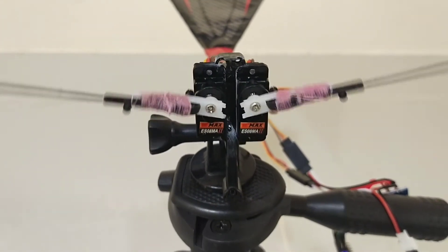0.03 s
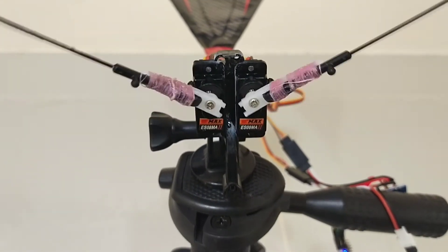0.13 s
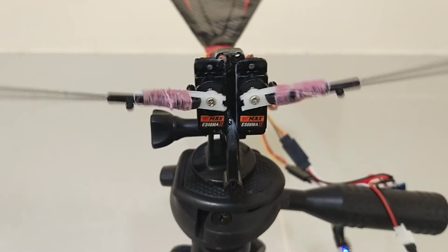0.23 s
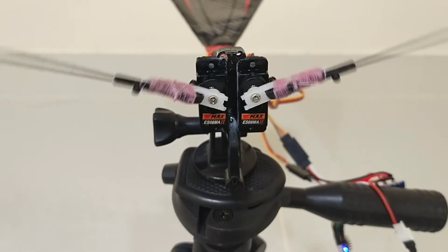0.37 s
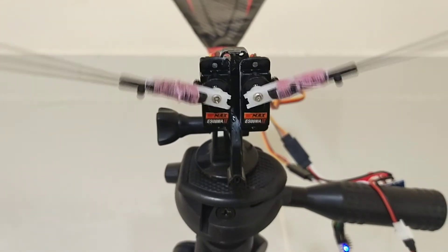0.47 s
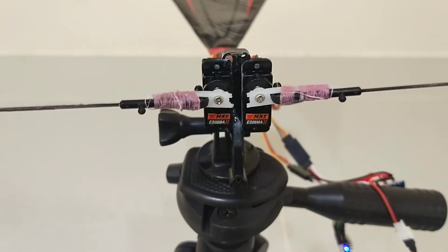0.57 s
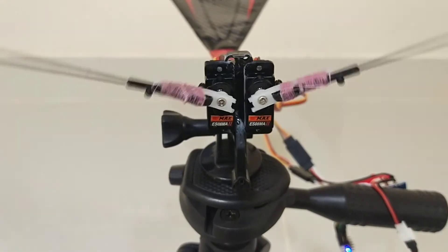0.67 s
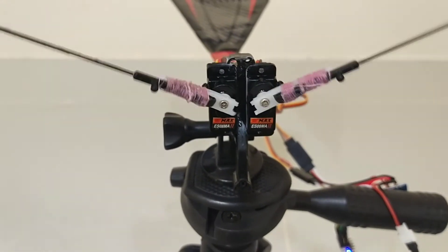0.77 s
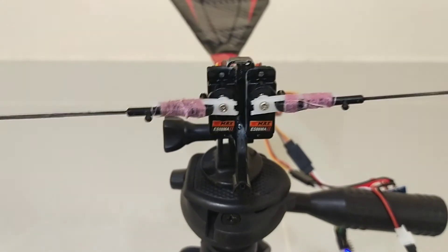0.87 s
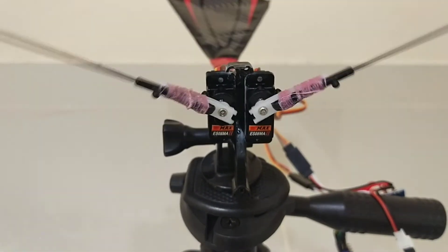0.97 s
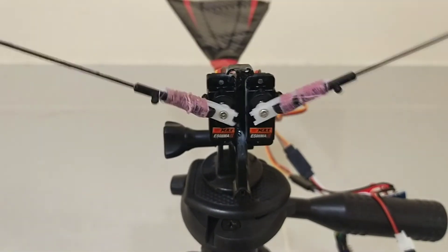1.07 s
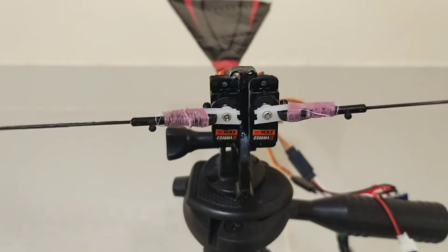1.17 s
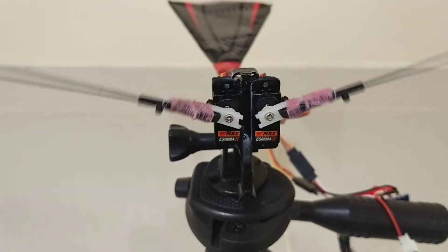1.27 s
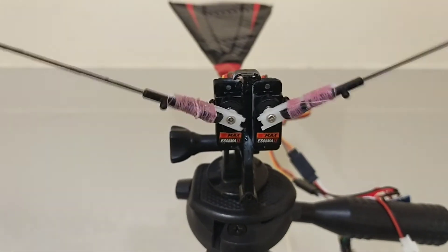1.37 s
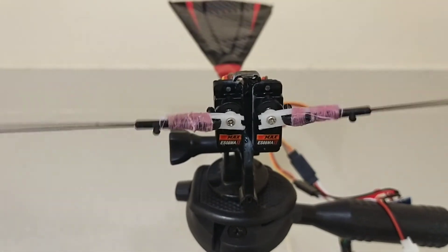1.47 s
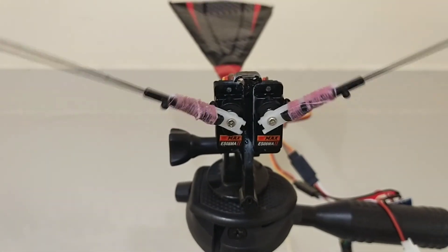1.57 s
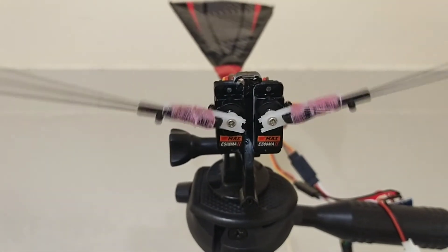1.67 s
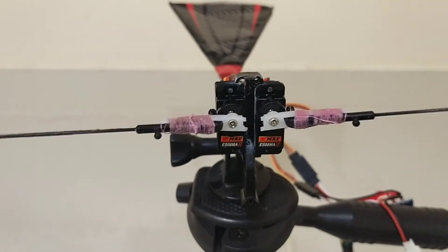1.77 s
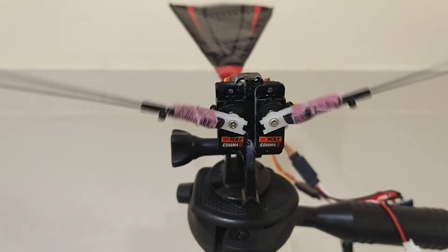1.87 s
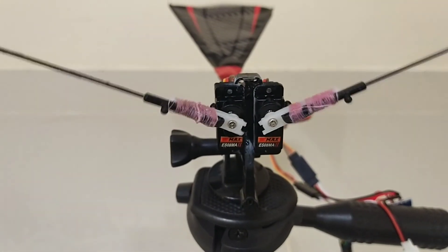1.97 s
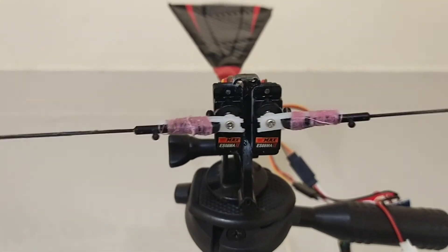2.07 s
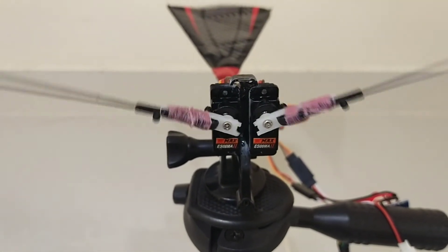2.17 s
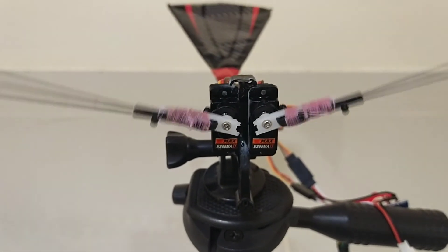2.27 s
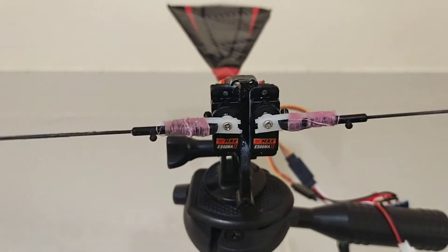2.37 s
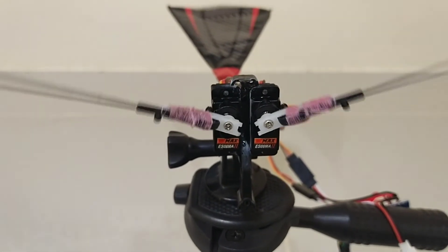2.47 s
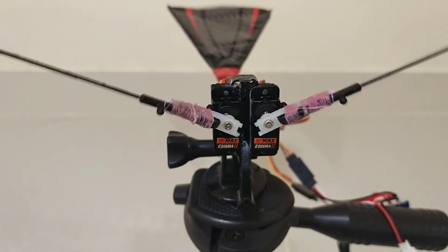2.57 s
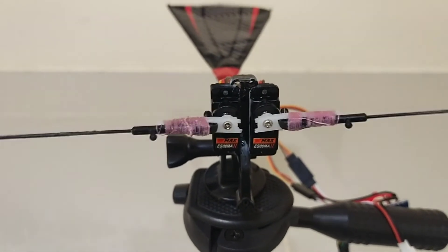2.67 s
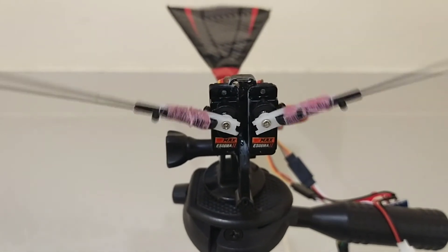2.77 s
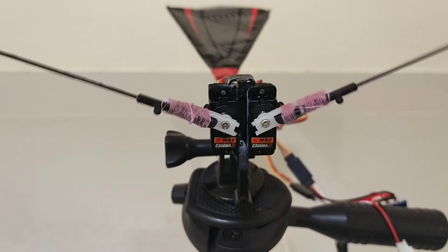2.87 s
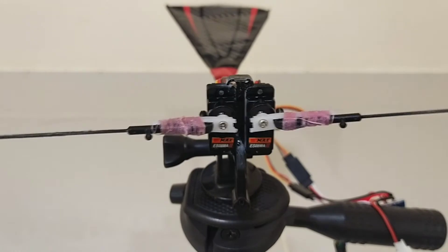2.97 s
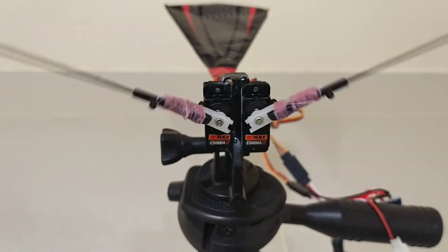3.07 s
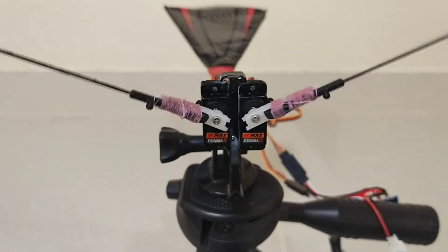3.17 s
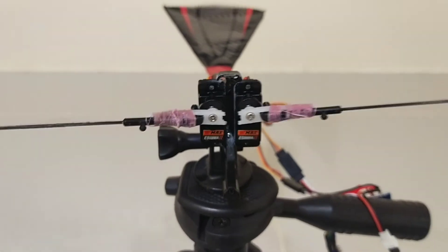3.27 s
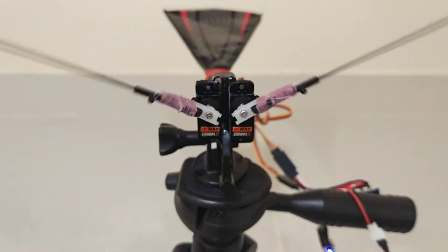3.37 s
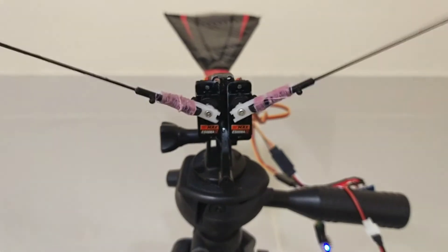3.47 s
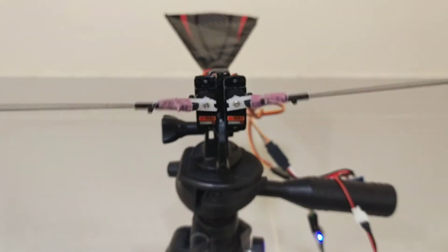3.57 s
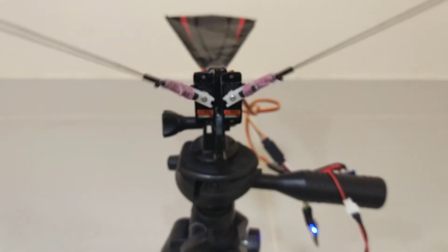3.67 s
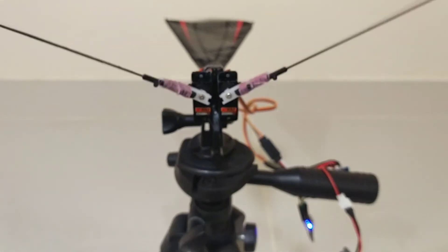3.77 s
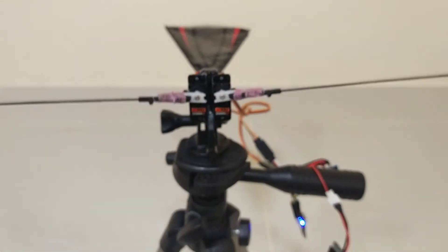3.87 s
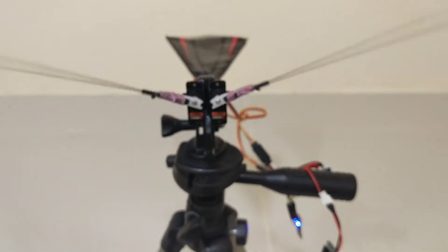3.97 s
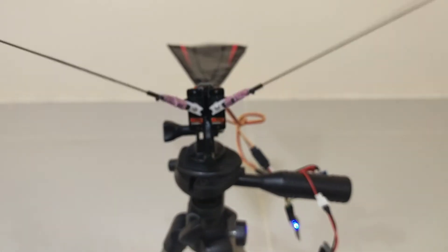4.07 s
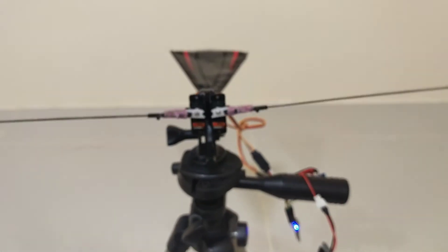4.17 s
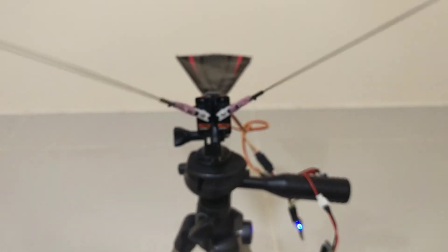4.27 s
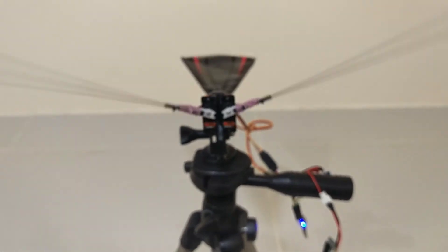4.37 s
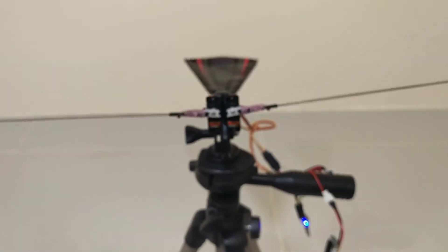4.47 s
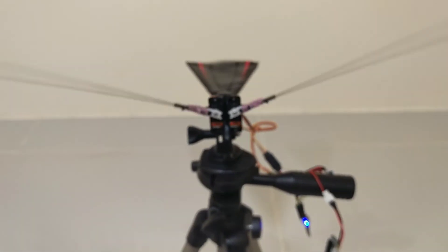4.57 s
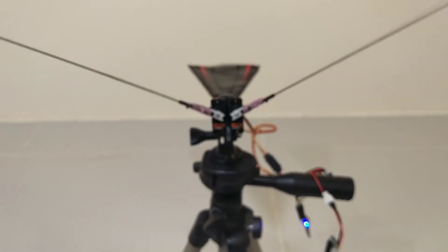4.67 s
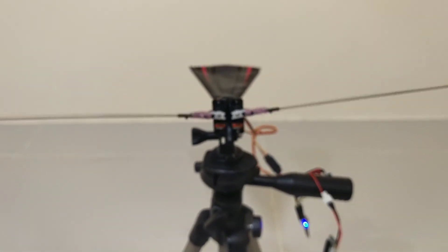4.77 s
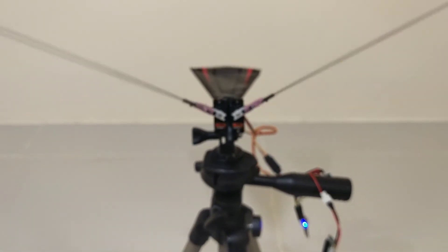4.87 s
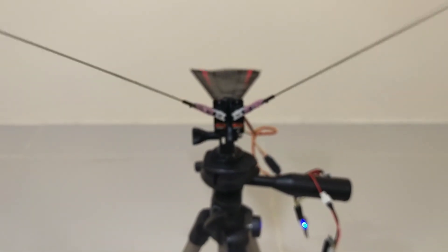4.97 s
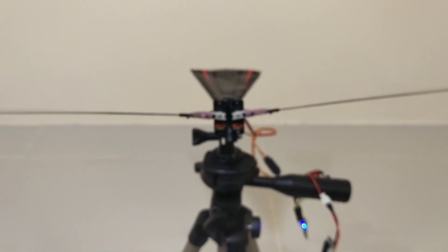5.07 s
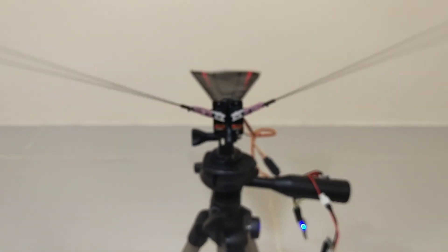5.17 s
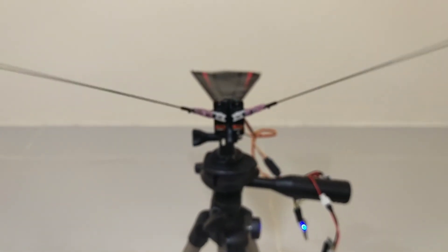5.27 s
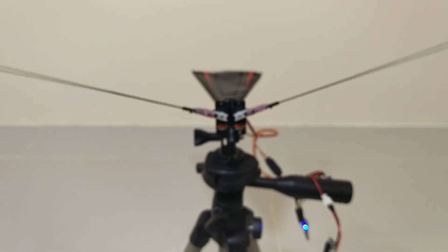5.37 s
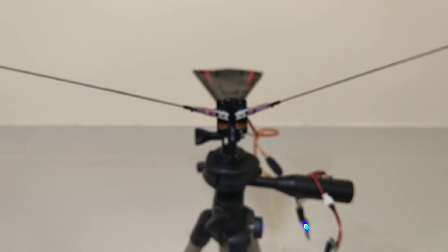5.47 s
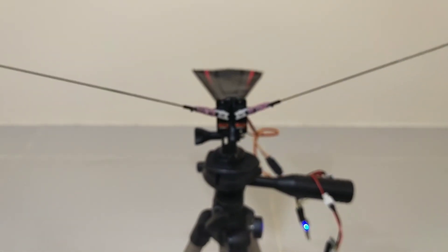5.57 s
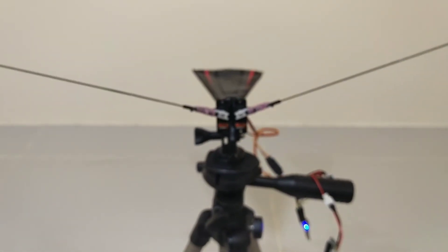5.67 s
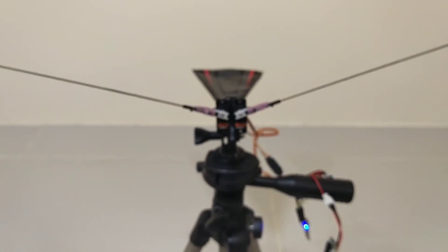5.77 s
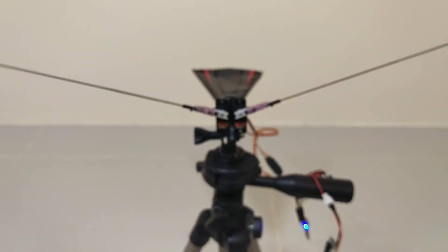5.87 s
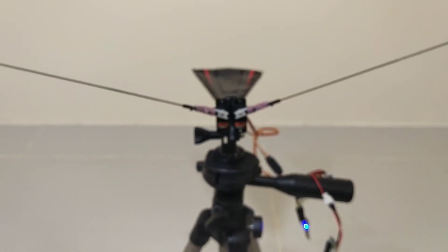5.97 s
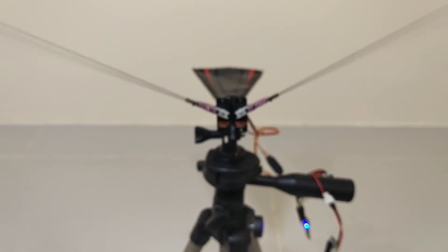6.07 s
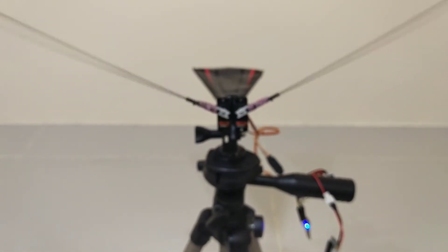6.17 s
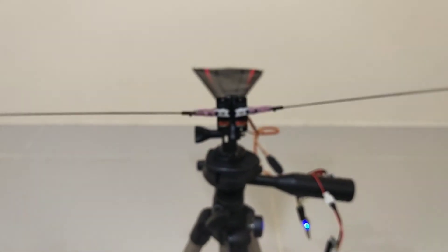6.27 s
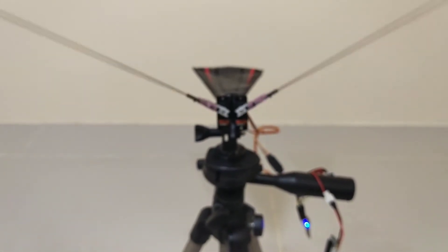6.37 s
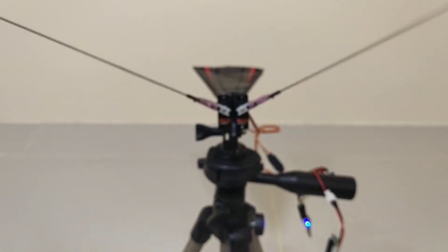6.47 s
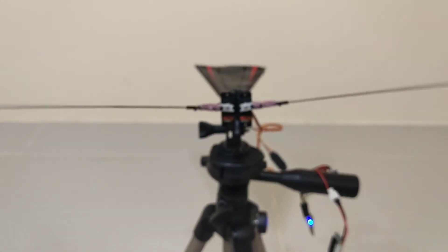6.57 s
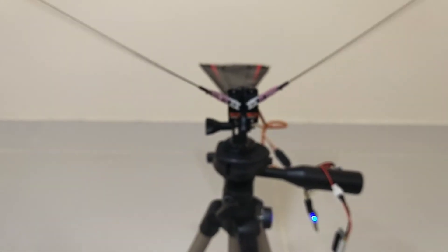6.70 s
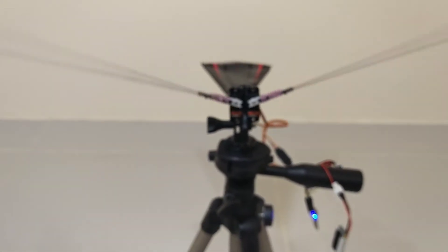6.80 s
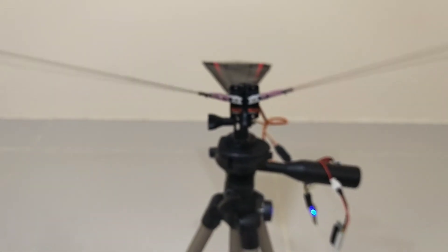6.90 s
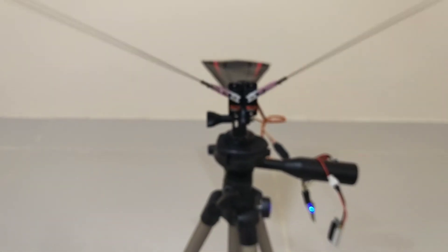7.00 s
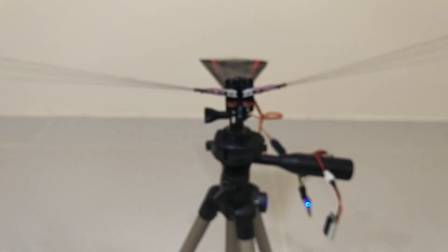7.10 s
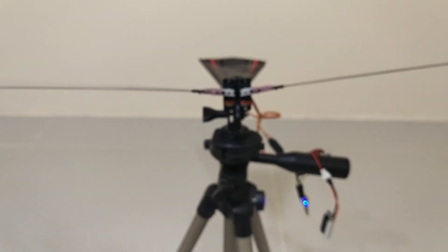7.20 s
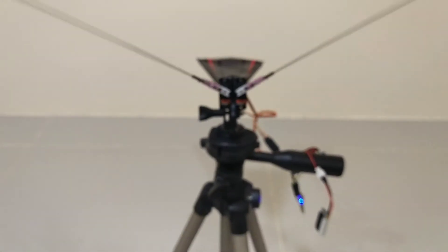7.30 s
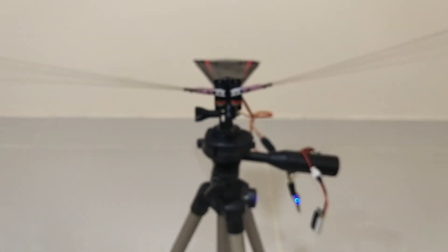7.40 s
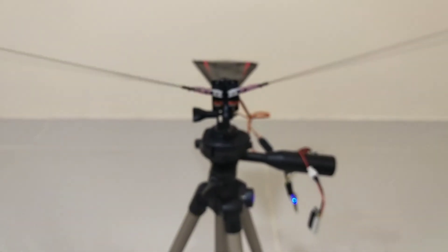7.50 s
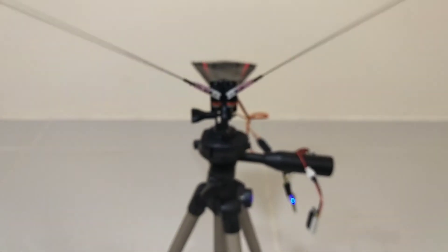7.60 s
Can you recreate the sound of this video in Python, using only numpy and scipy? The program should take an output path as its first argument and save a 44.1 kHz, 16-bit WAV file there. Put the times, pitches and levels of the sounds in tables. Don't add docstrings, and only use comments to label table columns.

```python
import sys
import numpy as np
from scipy import signal
from scipy.fft import rfft, irfft, next_fast_len
from scipy.io import wavfile
from scipy.ndimage import uniform_filter1d, map_coordinates

SR = 44100
rng = np.random.default_rng(int(sys.argv[2]) if len(sys.argv) > 2 else 0)


def generate_wav(signal):
    frames = np.transpose(np.atleast_2d(signal))
    scaled = np.clip(frames, -1, 1) * 32767
    pcm = np.round(scaled).astype(np.int16)
    wavfile.write(sys.argv[1], SR, pcm)


def invert_db(x):
    u = np.asarray(x, float) / 20
    return 10 ** u


N = 336924
T = np.arange(N) / SR


def unit(x):
    return x / np.sqrt(np.mean(x ** 2) + 1e-20)


def along(points, hz, column=1):
    rows = np.transpose(points)
    return np.interp(np.log(hz + 1), np.log(rows[0] + 1), rows[column])


def curves(rows, at=T):
    start, *columns = np.transpose(rows)
    return [np.interp(at, start, column) for column in columns]


def wobble(rate):
    knots = rng.standard_normal(int(N * rate / SR) + 4)
    return map_coordinates(knots, [np.arange(N) * rate / SR])


def filtered(x, response):
    m = next_fast_len(N + 8192)
    return irfft(rfft(x, m) * response(np.fft.rfftfreq(m, 1 / SR)), m)[..., :N]


def below(x, hz, order):
    return filtered(x, lambda f: 1 / (1 + (f / hz) ** order))


def above(x, hz, order=16):
    return filtered(x, lambda f: 1 / (1 + (hz / (f + 1)) ** order))


def pair(alike):
    common, left, right = rng.standard_normal((3, N))
    alike = np.clip(alike, 0, 1)
    return np.sqrt(alike) * common + np.sqrt(1 - alike) * np.array([left, right])


def patches(x, patchy_db, size):
    z = signal.stft(x, nperseg=512)[2]
    field = uniform_filter1d(rng.standard_normal(z.shape[1:]), size=size, axis=0)
    field = uniform_filter1d(field, size=7, axis=1)
    return signal.istft(z * invert_db(patchy_db * unit(field)), nperseg=512)[1][:, :N]


def narrow(hz, width_hz, alike):
    return unit(filtered(pair(alike), lambda f: 1 / (1 + ((f - hz) / width_hz) ** 2)))


def swells(rows, order):
    gain = np.zeros(N)
    for s, db, rise, fall in rows:
        away = np.maximum((s - T) / rise, (T - s) / fall)
        gain += invert_db(np.maximum(db - 20 * away ** order, -200))
    return gain


# (f/Hz, level/dB)
ROOM_AIR = [(30, -32), (60, -11), (130, -0.3), (250, -10.5), (500, -21.5), (1000, -27.5), (1750, -28),
            (2150, -15.5), (2600, -29.5), (3700, -23), (5500, -27.5), (7800, -23), (11000, -25.5),
            (15500, -31)]


def room_air():
    return invert_db(-65) * unit(filtered(pair(alike=.6), lambda f: invert_db(along(ROOM_AIR, f))))


# (t/s, 55 Hz mode level/dB, 86 Hz mode level/dB, time to die 20 dB/s)
FLOOR_THUDS = [(0, -51, -64, .09), (.08, -70, -53, .15), (.42, -47, -61, .15), (1.04, -62, -68, .2),
               (1.51, -71, -69, .4), (2.58, -70, -58, .3), (2.7, -58, -55, .5), (2.92, -61, -59, .35),
               (3.62, -77, -61, .3), (4.23, -80, -59, .13), (4.45, -79, -62, .14), (4.74, -65, -59, .3),
               (5.02, -50, -62, .3), (5.28, -70, -58, .25), (5.57, -73, -60, .9), (6.5, -53, -60, .16),
               (6.98, -69, -60.5, .3), (7.34, -51, -66, .35)]
THUD_RISE_S, STILL_DB = .13, -80


def floor_thuds():
    low_rows = [(s, low_db, THUD_RISE_S, fall) for s, low_db, _, fall in FLOOR_THUDS]
    high_rows = [(s, high_db, THUD_RISE_S, fall) for s, _, high_db, fall in FLOOR_THUDS]
    low = (invert_db(STILL_DB) + swells(low_rows, order=1)) * narrow(55, 5.1, alike=.85)
    high = (invert_db(STILL_DB) + swells(high_rows, order=1)) * narrow(86, 22, alike=.77)
    return invert_db([[1.5], [-1.5]]) * (low + high)


# (t/s, level/dB, time to rise 20 dB/s, time to die 20 dB/s)
HOLDING_HISS = [
    (5.5, -63, .35, .17),
    (5.79, -55.5, .13, .14),
]


def holding_hiss():
    flutter = invert_db([[3], [-3]] + 2.5 * wobble(150))
    return swells(HOLDING_HISS, order=2) * flutter * narrow(7850, 270, alike=.5)


# (t/s, level/dB, time to rise 20 dB/s, time to die 20 dB/s)
PAUSE_HUM = [
    (5.38, -60.5, .07, .26),
]


def pause_hum():
    return swells(PAUSE_HUM, order=1) * narrow(495, 32, alike=.44)


def background():
    return room_air() + floor_thuds() + holding_hiss() + pause_hum()


# (f/Hz, t60/s)
WALL_DECAY = [(300, 1), (3000, 0.48), (8000, 0.34), (15000, 0.1)]


def room(x):
    hz, t, z = signal.stft(rng.standard_normal((2, SR // 2)), SR, nperseg=256)
    fall = invert_db(-60 * t / along(WALL_DECAY, hz)[:, None])
    tail = signal.istft(z * fall, SR, nperseg=256)[1]
    late = np.pad(x, ((0, 0), (300, 0)))
    return signal.fftconvolve(late, tail / np.linalg.norm(tail[0]), axes=1)[:, :N]


FLAP_S, UP_SHARE = .3004, .527
START_S, STOP_S, TWITCH_S, RESTART_S = -.063, 5.133, 5.198, 5.935


def flapping():
    flap = (T - np.where(T < RESTART_S, START_S, RESTART_S)) / FLAP_S % 1
    up = flap < UP_SHARE
    share = np.where(up, flap / UP_SHARE, (flap - UP_SHARE) / (1 - UP_SHARE))
    return share, up.astype(int), (1 - np.abs(2 * share - 1)) * (2 * up - 1)


def drive():
    cut = -900 * np.clip(T - STOP_S, 0, None)
    twitch = 1.9 - 170 * np.abs(T - TWITCH_S)
    again = -1150 * np.clip(RESTART_S + .057 - T, 0, None)
    return np.maximum(np.max([cut, twitch, again], axis=0), -90)


STROKE_TIMING = [
    (.13, .2, 3.2, .2),
    (.2, .12, 3.6, .8),
]
HELD_LOAD_DB = -13


def load(rows, share, up):
    rise, brake, whips, delay = np.array(STROKE_TIMING)[up].T
    start_db, swell_db, end_db, whip_db = np.array(rows)[up].T
    db = start_db * np.clip(1 - share / rise, 0, 1)
    db = db + end_db * np.clip(1 - (1 - share) / brake, 0, 1)
    db = db + swell_db * (share - .6)
    db = db + whip_db * np.cos(2 * np.pi * (whips * share - delay))
    held = (T > STOP_S + .008) & (T < RESTART_S)
    return uniform_filter1d(np.where(held, HELD_LOAD_DB, db), size=200)


MOTOR_SPEED = [(0, 230), (.17, 272), (.42, 300), (.68, 328), (.87, 302), (1, 230)]


def motor_turns(share):
    return np.cumsum(curves(MOTOR_SPEED, share)[0] * (1 + .025 * wobble(50))) / SR


# (beats per turn, level/dB)
COMMUTATOR = [
    (3, -0.36),
    (5, -11),
]


def whine(turns):
    both = np.array([turns + .05 * wobble(90), turns * 1.04 + .1 * wobble(40)])
    tones = 0
    for beats, db in COMMUTATOR:
        unsteady = invert_db(db + 2.4 * np.array([wobble(60), wobble(60)]))
        tones = tones + unsteady * np.sin(2 * np.pi * round(beats) * both)
    return np.array([[.77, .51], [.59, .53]]) @ tones


def teeth(turns, gate_db, rattle_db):
    beat = invert_db(gate_db * np.cos(2 * np.pi * turns) + rattle_db * wobble(900) + .62 * wobble(70))
    return unit(beat * pair(alike=.56))


def arrival(rattle, depth, far):
    n = np.arange(N)
    lag = 2.7 + (.2 - 2.7) * far
    rattle[0] = np.interp(n - np.round(lag), n, rattle[0])
    delayed = n - SR * .0014 * (1 + .05 * wobble(6))
    share_back = np.clip(.55 * (depth - 1.05), 0, 1)
    bounce = np.array([np.interp(delayed, n, side) for side in rattle])
    return (rattle + share_back * bounce) / np.sqrt(1 + share_back ** 2 / 2)


# (f/Hz, level/dB)
LEFT_COLOUR = [(400, -46), (1500, -40), (3500, -27.5), (5000, -18.5), (6200, -7), (7200, -3.5), (8300, -2),
               (9600, -13.5), (10400, -4.5), (11300, -1), (12300, -8), (13500, -7), (14600, -3.5),
               (15600, -18)]
RIGHT_COLOUR = [(400, -49), (1500, -45), (3500, -34.0), (5000, -18.5), (6200, -16), (7400, 5.5),
                (8200, -0.67), (9300, -8), (10300, -8.5), (11300, -40), (12600, -8), (14000, -20),
                (14800, -15), (15600, -34)]
# (f/Hz, left level/dB, right level/dB)
UPSTROKE_COLOUR = [(2500, 1.5, 1.5), (5800, -3, -2.5), (7300, -1.5, -1.5), (8300, -1.5, 4), (10000, .5, .5),
                   (12500, .5, .5), (14200, 1.5, -4)]
# (f/Hz, width/Hz, level over surroundings/dB)
CASE_RINGS = [(2492, 187, 12.5), (2945, 52, 7), (4140, 160, -5.5), (4530, 250, -1.5), (4910, 62, -3),
              (6925, 90, 4.5), (6900, 590, 0.5), (10400, 100, -5.5)]


def cases(rattle, lifting):
    def colour(f):
        rings = sum(db / (1 + ((f - hz) / width * 2) ** 2) for hz, width, db in CASE_RINGS)
        return invert_db(np.array([along(LEFT_COLOUR, f), along(RIGHT_COLOUR, f)]) + rings)

    def turned(f):
        return colour(f) * invert_db([along(UPSTROKE_COLOUR, f, column=1), along(UPSTROKE_COLOUR, f, column=2)])

    up = uniform_filter1d(lifting.astype(float), size=600)
    return unit((1 - up) * filtered(rattle, colour) + up * filtered(rattle, turned))


SIDES = np.array([[.5], [-.5]])


def top_rattle(top, load_db, level_db, angle, depth, lift):
    top_db = -4.3 + 9.5 * angle + (-1.3 + 2.5 * depth) * lift
    pan_db = -4.2 + 2.4 * angle
    beam_db = 1.3 + .22 * (level_db + 20)
    beamed = top + (invert_db(beam_db) - 1) * above(top, 12200)
    return beamed * invert_db(depth * load_db + top_db + SIDES * pan_db)


def gear_growl(growl, load_db, level_db, depth, far, late_db):
    drone_db = 1.1 - 3.5 * far + late_db
    ring_db = -7.5 - 1.5 * (level_db + 20) + 4 * far
    drone = below(growl, 1750, order=12)
    head = filtered(growl, lambda f: 1 / (1 + ((f - 2020) / 65) ** 2))
    growl = growl + (invert_db(drone_db) - 1) * drone + invert_db(ring_db) * head
    held = (T > STOP_S + .02) & (T < RESTART_S)
    return growl * invert_db(.45 * depth * load_db - 3.5 + 5.5 * far - 9 * held)


# (t/s, level/dB, angle off axis [0-1], shading by the moving arms [ratio], left over right/dB)
PHONE_PLACE = [(0, -9.5, -.1, 1.2, 4), (.5, -11.5, .15, 1.2, 4.2), (1.1, -12.6, .45, 1.15, 5.3),
               (2.25, -12.2, .55, 1.3, 5.5), (2.45, -16, .72, 1.35, 4), (2.75, -18.5, .8, 1.6, 3.5),
               (3.3, -20, .8, 1.8, 1.5), (3.65, -25.5, 1.1, 1.95, 2.5), (3.95, -29, 1.1, 1.95, 6),
               (4.4, -28.7, .95, 1.85, 7.5), (4.83, -25, .45, 1.8, 7.5), (5.1, -27.3, .4, 1.25, 6),
               (5.95, -22, .8, .75, 7), (6.25, -20, .65, .8, 6), (6.7, -18.2, .5, 1.05, 5.5),
               (7.1, -19.3, .5, .8, 7.5), (7.64, -21.5, .5, .5, 7)]
# (start dip/dB, swell a stroke/dB, end dip/dB, whip/dB)
CASE_STROKE = [
    (-6.5, 8, -14, 1.1),
    (-7, 4.5, -14, .9),
]
TOP_STROKE = [
    (-5.5, 7, -13.5, .4),
    (-7, 3, -18, .9),
]
RETREAT_S, RETREAT_LASTS_S = 2.4, 2.2


def servos():
    share, lifting, lift = flapping()
    level_db, angle, depth, pan_db = curves(PHONE_PLACE)
    far = np.clip((T - RETREAT_S) / RETREAT_LASTS_S, 0, 1)
    load_db = load(CASE_STROKE, share, lifting)
    top_load_db = load(TOP_STROKE, share, lifting)
    late_db = -12 * (T > RESTART_S) * np.exp(-np.abs(T - RESTART_S) / .2)

    turns = motor_turns(share)
    rattle = patches(teeth(turns, gate_db=.5, rattle_db=1.5), patchy_db=1.5, size=6)
    gears = cases(arrival(rattle, depth, far), lifting)
    top = above(gears, 9300)
    blotchy = patches(gears, patchy_db=4.5, size=2)
    gears = gears + below(blotchy - gears, 5400, order=12)
    low = below(gears, 3800, order=8)

    pan_db = pan_db + (.6 + 1.2 * far) * lift
    case = (gears - top - low) * invert_db(depth * load_db + SIDES * pan_db)
    treble = top_rattle(top, top_load_db, level_db, angle, depth, lift)
    growl = gear_growl(low, load_db, level_db, depth, far, late_db)
    whine_db = -47.5 + 5 * angle + 1.9 * depth
    tones = whine(turns) * invert_db(1.66 * depth * load_db + whine_db + late_db)

    lift_db = (.6 - .9 * depth) * lift
    return invert_db(level_db + lift_db + drive() + 2) * (case + treble + growl + tones)


def scene():
    rig = servos()
    return rig + room(rig * invert_db(-10.1)) + background()


def low_pass(x):
    return signal.sosfilt(signal.butter(12, 15700, fs=SR, output="sos"), x)


def record(dry):
    loud = filtered(dry, lambda f: f < 19000)
    clipped = loud / (1 + np.abs(loud / .92) ** 9) ** (1 / 9)
    kept = filtered(clipped, lambda f: f < 15720)
    return low_pass(kept)


dry = scene()
out = record(dry)
generate_wav(out)
```